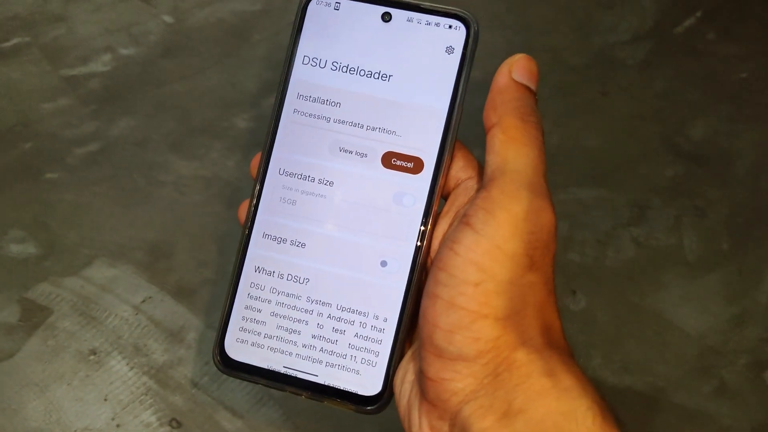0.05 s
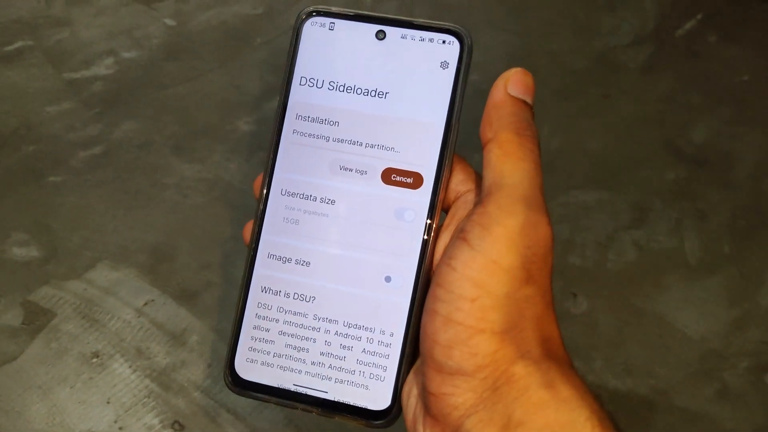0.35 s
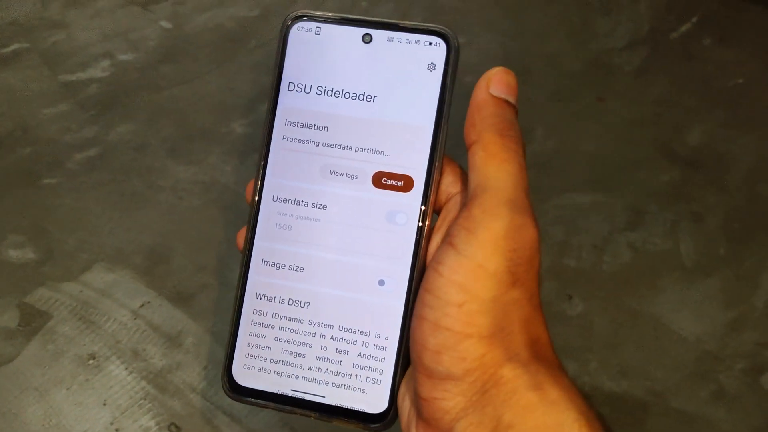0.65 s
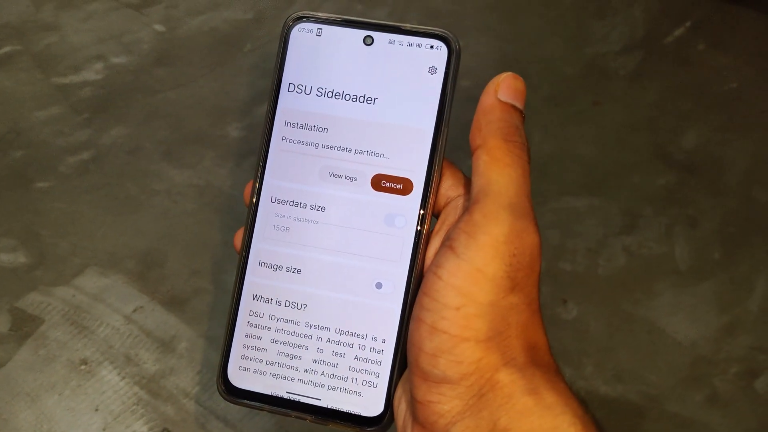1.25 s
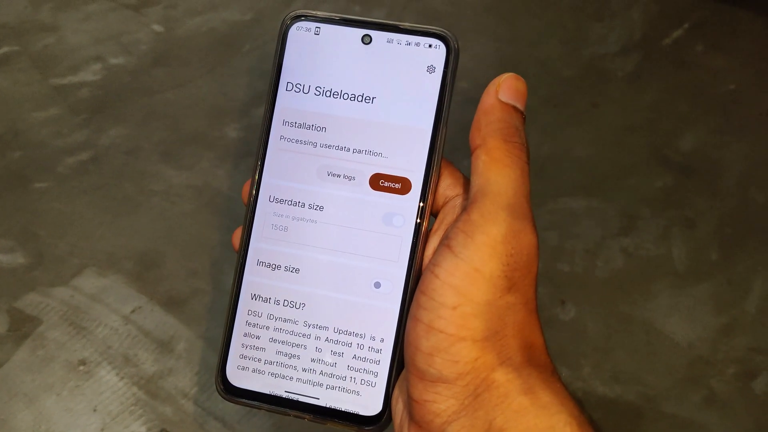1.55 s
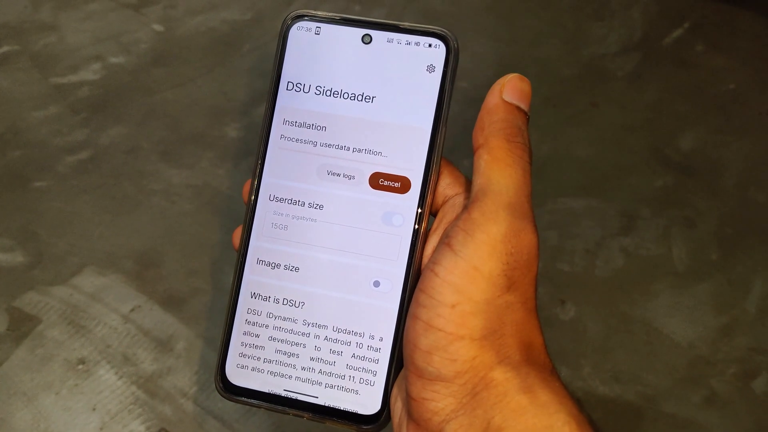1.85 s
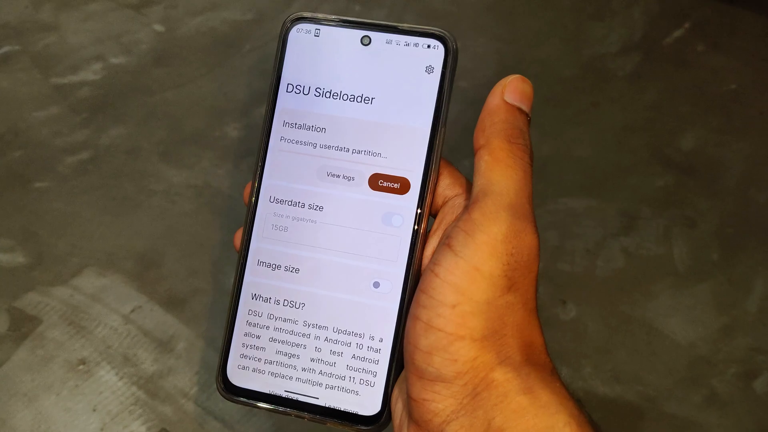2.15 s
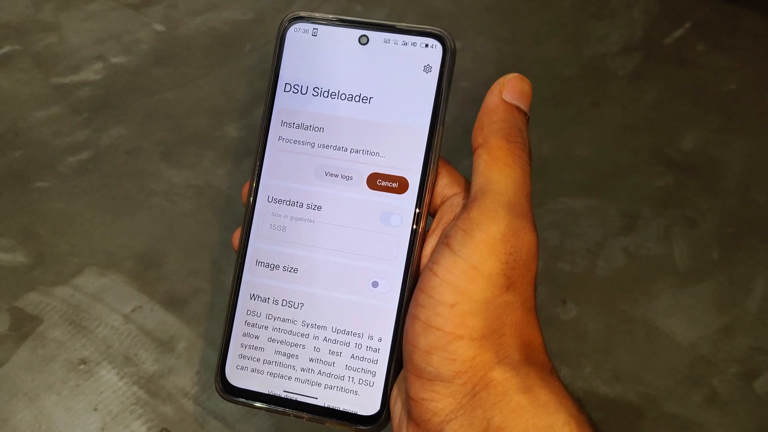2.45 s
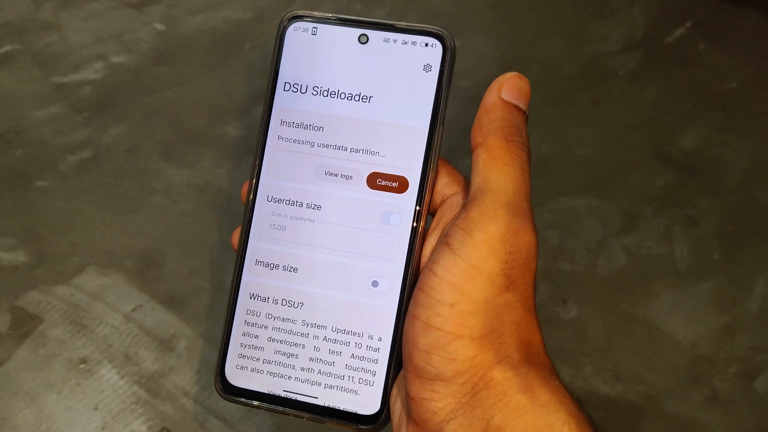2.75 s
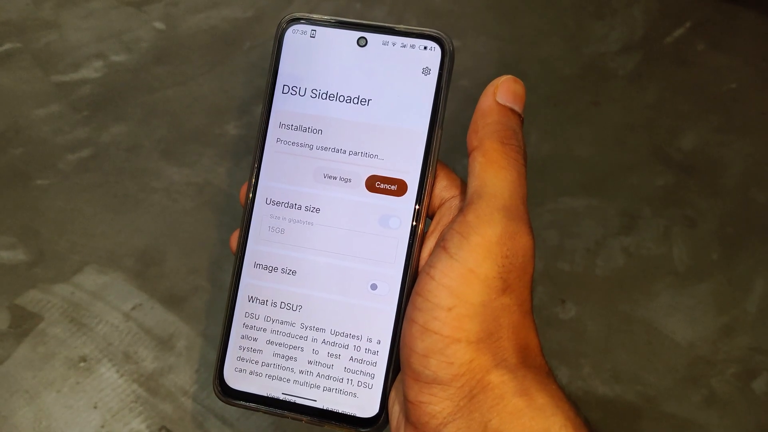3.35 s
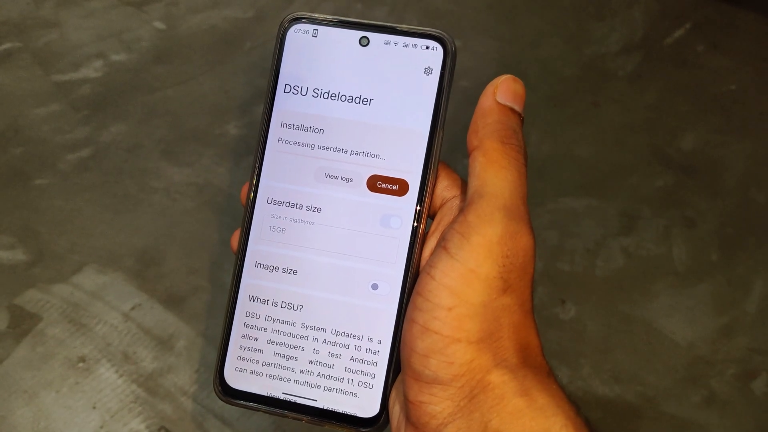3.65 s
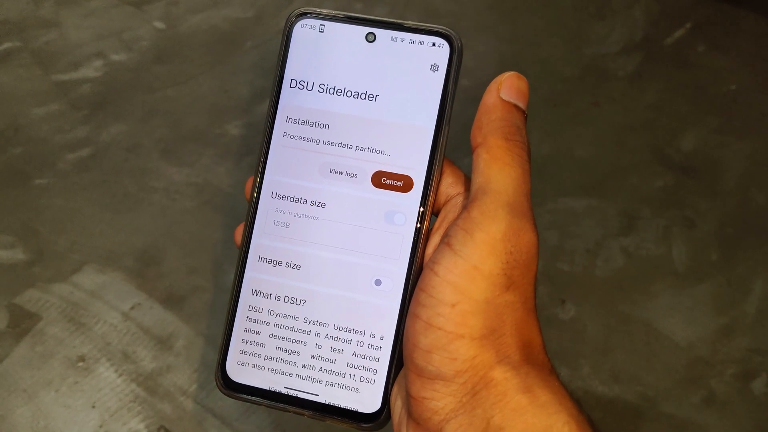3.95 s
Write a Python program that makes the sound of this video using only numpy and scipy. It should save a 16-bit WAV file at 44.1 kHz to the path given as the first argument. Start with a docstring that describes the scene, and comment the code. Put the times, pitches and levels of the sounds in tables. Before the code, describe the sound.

A phone's plastic case clicks and creaks as it is handled up close, with dull bumps on the microphone. Light, hissing skin strokes follow in the second half, over low electrical hum and faint hiss in a quiet room.

```python
"""A low mains hum in a quiet room, over dull air and a thin, steady hiss.
Close by, the grip on a phone shifts: the hand rumbles and bumps softly against the microphone,
and the plastic case ticks and creaks in short clusters. In the second half, skin brushes over
the case in short, hissing strokes."""
import sys
import numpy as np
from scipy import signal
from scipy.fft import rfft, irfft
from scipy.io import wavfile
from scipy.ndimage import uniform_filter1d

SR = 44100
rng = np.random.default_rng(int(sys.argv[2]) if len(sys.argv) > 2 else 0)


def dump(signal):
    """Clip the signal to [-1, 1] and save it as 16-bit WAV at the path in sys.argv[1]."""
    limited = np.clip(np.atleast_2d(signal).T, -1, 1)
    pcm = np.round(limited * 32767).astype(np.int16)
    wavfile.write(sys.argv[1], SR, pcm)


N = 176400
CASE_SIDE_DB = -11  # stereo side re mid, ticks and creaks


def amp(db):
    """Decibels to gain."""
    return 10 ** (np.asarray(db) / 20)


def unit(x):
    """Scale to rms 1."""
    return x / np.sqrt(np.mean(x ** 2) + 1e-20)


def spectrum_db(points, hz):
    """Interpolate (Hz, dB) points on a log-frequency axis."""
    point_hz, db = np.transpose(points)
    return np.interp(np.log(hz + 1), np.log(point_hz + 1), db)


def envelope(points):
    """Gain per sample from (s, dB) points."""
    return amp(np.interp(np.arange(N) / SR, *np.transpose(points)))


def add(mix, start_s, sound):
    """Mix a sound in at start_s."""
    part = mix[..., max(round(start_s * SR), 0):][..., :sound.shape[-1]]
    part += sound[..., :part.shape[-1]]


def noise(gain, size=N):
    """Noise of rms 1, spectrum shaped by gain(Hz)."""
    white = rfft(rng.standard_normal(size))
    return unit(irfft(white * gain(np.fft.rfftfreq(size, 1 / SR)), size))


def band(hz, sigma_hz, size=N):
    """Noise of rms 1 in one Gaussian band."""
    return noise(lambda f: np.exp(-.5 * ((f - hz) / sigma_hz) ** 2) + 1e-9, size)


def stereo(mid, side, balance_db=1.2):
    """Mid and side to left and right, left slightly louder."""
    return np.array([(mid + side) * amp(balance_db / 2), (mid - side) * amp(-balance_db / 2)])


# Each row: frequency in Hz, relative spectral density in dB.
AIR_SPECTRUM = [(20, -5), (45, 3), (75, -2), (130, -3.5), (200, -9.5), (300, -8.5), (470, -7.5), (720, -13),
                (1300, -13.5), (1800, -20.5), (2500, -25.5), (3500, -28), (5000, -33.5), (6500, -38.5),
                (8500, -38.5), (11000, -42.5), (15500, -42)]


def room_air(air_db=-43.5, flicker_db=.92, hiss_hz=7630, hiss_db=-70.5):
    """Dull, faintly flickering air with a narrow band of steady hiss."""
    steady = noise(lambda f: amp(spectrum_db(AIR_SPECTRUM, f)))
    cells = signal.stft(steady, nperseg=1024)[2]
    flicker = uniform_filter1d(rng.standard_normal(cells.shape), size=8, axis=0)
    flicker = unit(uniform_filter1d(flicker, size=8, axis=1))
    air = signal.istft(cells * amp(flicker_db * flicker))[1][:N]
    return amp(air_db) * unit(air) + amp(hiss_db) * band(hiss_hz, sigma_hz=260)


# Each row: time in seconds, level of the hum's octave in dB.
OCTAVE_LEVELS = [(0, -50), (.2, -52), (.35, -41.5), (.53, -44), (.85, -38.5), (1.02, -51.5), (1.4, -40.5),
                 (1.56, -46), (1.78, -41), (1.9, -42), (2.2, -38.5), (2.35, -45), (2.47, -40.5),
                 (2.75, -37.5), (3.15, -58), (3.43, -41), (3.8, -50.5), (4, -33.5)]
# Each row: frequency in Hz, level in dB, noise share of the rms (0-1), noise band sigma in Hz.
HUM_PARTIALS = [(50.3, -29, 0.11, 2.2), (109.5, -57.5, 0.7, 1), (144.6, -52.5, 0.84, 2.9),
                (159.6, -52.5, .75, 5.3), (186.4, -59.5, 0.88, 4), (212.8, -69.5, 1, 2.7),
                (235, -61.5, 0.06, 1.5), (250, -60, .9, 7.8), (303.2, -59, .8, 3.3),
                (344.5, -63, 0.66, 1.5)]


def mains_hum(octave_hz=100.13):
    """A firm mains fundamental, an octave that swells and sinks, and weaker, wavering partials."""
    t = np.arange(N) / SR
    out = envelope(OCTAVE_LEVELS) * unit(np.sin(2 * np.pi * octave_hz * t))
    for hz, db, noise_share, sigma_hz in HUM_PARTIALS:
        tone = np.sqrt(2 * (1 - noise_share ** 2)) * np.sin(2 * np.pi * (hz * t + rng.random()))
        out += amp(db) * unit(tone + noise_share * band(hz, sigma_hz))
    return out


# Each row: time in seconds, rumble level in dB.
RUMBLE_LEVELS = [(0, -49), (.2, -41.5), (1.0, -42), (1.15, -35), (1.35, -41), (1.55, -38), (1.95, -41),
                 (2.25, -43), (2.4, -35.5), (2.65, -35.5), (2.9, -43), (3.2, -33.5), (3.6, -39.5), (4, -46)]
# Each row: peak time in seconds, peak level in dB, pitch in Hz, 1/e half-length in seconds.
HAND_BUMPS = [(1.107, -26, 22, 0.016), (1.593, -23.5, 36.2, 0.0087), (2.743, -20.5, 72, 0.0058)]


def hand(rumble_hz=18.5, rub_hz=236, rub_gain_db=-16):
    """The hand moves against the microphone: deep rumble, dull rubbing and soft bumps."""
    t = np.arange(N) / SR
    rumble = band(rumble_hz, sigma_hz=10.5)
    rub = amp(rub_gain_db) * band(rub_hz, sigma_hz=95)
    out = envelope(RUMBLE_LEVELS) * (rumble + rub)
    for peak_s, db, hz, half_s in HAND_BUMPS:
        pulse = np.exp(-((t - peak_s) / half_s) ** 2)
        out += amp(db) * pulse * np.cos(2 * np.pi * hz * (t - peak_s))
    return out


# Each row: frequency in Hz, relative spectral density of the friction in dB.
SKIN_SPECTRUM = [(800, -2), (3000, -10.5), (5000, -11.5), (5900, -15), (7000, -9), (8400, -4), (9100, -9.5),
                 (10500, -9.5), (11000, -1.5), (11800, -5), (12500, 2), (13500, -5), (14600, 3),
                 (15800, -3.5)]
# Each row: start in seconds, time until the fade in seconds, level in dB.
SKIN_STROKES = [(2.361, 0.015, -46), (2.391, 0.016, -41), (2.541, .045, -46.5), (2.662, .02, -56),
                (2.728, 0.052, -46), (2.845, .02, -56), (2.908, 0.057, -45.5), (3.025, .02, -56),
                (3.083, 0.038, -56.5), (3.123, .022, -52.5), (3.27, .02, -61), (3.302, .022, -49.5),
                (3.454, 0.056, -48.5), (3.582, .02, -53), (3.63, 0.054, -59), (3.848, .012, -59)]


def skin_strokes(attack_s=.013, fall_db_per_s=337, room_gain_db=-11, room_db_per_s=95):
    """Bright friction of skin on the case: each stroke rises, holds and fades into a faint room tail."""
    grain_db, grain_s = 1.5, .01
    t, power = np.arange(N) / SR, np.zeros(N)
    for start_s, hold_s, db in SKIN_STROKES:
        rise = np.clip((t - start_s) / attack_s, 0, 1)
        fading_s = np.maximum(t - start_s - hold_s, 0)
        direct = amp(-fall_db_per_s * fading_s)
        room = amp(room_gain_db - room_db_per_s * fading_s)
        power += (amp(db) * rise) ** 2 * (direct ** 2 + room ** 2)
    grain = unit(amp(grain_db * noise(lambda f: 1 / (1 + f * grain_s))))
    friction = noise(lambda f: amp(spectrum_db(SKIN_SPECTRUM, f)))
    return np.sqrt(power) * grain * friction


# Each row: peak time in seconds, mid level at the peak in dB, centre in Hz, band sigma in Hz,
# 1/e half-length in seconds.
CASE_CREAKS = [(.1823, -44.5, 7300, 700, 0.0015), (0.869, -31.5, 12700, 3530, .0016),
               (2.4726, -34, 14400, 900, .0014), (2.4806, -39.5, 6200, 1020, 0.0039),
               (2.482, -43, 12000, 3000, 0.0034), (2.8225, -39.5, 9700, 600, 0.00098)]


def case_creaks(grain_db=3, grain_hz=1420, size=2048):
    """Stick-slip of the plastic: grainy noise that swells and dies within milliseconds."""
    t = (np.arange(size) - size / 2) / SR
    out = np.zeros((2, N))
    for peak_s, db, hz, sigma_hz, half_s in CASE_CREAKS:
        swell = amp(db) * np.exp(-abs(t) / half_s)
        grain = unit(amp(grain_db * band(0, grain_hz, size)))
        mid = band(hz, sigma_hz, size)
        side = amp(CASE_SIDE_DB) * band(hz, sigma_hz, size)
        add(out, peak_s - size / 2 / SR, swell * grain * stereo(mid, side))
    return out


def case_response(low_db, middle_db, top_db, size, gain_db=26):
    """The case's colour as a minimum-phase response, with a dip between low and middle bands."""
    points = [(1200, low_db - 10.5), (5050, low_db), (6200, middle_db - 7.5),
              (9900, middle_db), (12600, top_db)]
    hz = np.fft.rfftfreq(size, 1 / SR)
    log_gain = np.log(amp(spectrum_db(points, hz) + gain_db))
    mirrored = np.r_[log_gain, log_gain[-2:0:-1]]
    return np.exp(np.conj(signal.hilbert(mirrored)))[:len(hz)]


def burst(decay_s, size):
    """Decaying noise of energy 1."""
    decay = np.exp(-np.arange(size) / SR / decay_s)
    return unit(rng.standard_normal(size) * decay) / np.sqrt(size)


# Each row: start in seconds, relative low, middle and top band levels in dB, rattle decay in seconds,
# ring pitch in Hz, ring level in dB.
CASE_TICKS = [(.1451, -68, -50.5, -54, .0008, 8200, -57), (0.443, -52.5, -59, -65, 0.00088, 3500, -50),
              (0.8711, -39.5, -36, -35, .0012, 3120, -25.5), (0.8717, -40, -51, -46, .0008, 9600, -33),
              (.8794, -61, -53, -45, .0006, 4400, -50), (.884, -60, -55, -48, .0006, 13000, -50),
              (0.885, -62, -47, -44, .0008, 7500, -48), (0.8885, -63, -56, -53, .0006, 7500, -48),
              (.925, -46, -44, -54, 0.0013, 4200, -45), (0.9334, -40, -41, -47, 0.0015, 4500, -35.5),
              (2.44, -65, -57, -51, 0.0012, 4500, -42), (2.4478, -63, -44, -36, .0012, 3900, -37),
              (2.4738, -56, -53, -37, .0012, 5500, -42), (2.4814, -43.5, -34.5, -33, 0.00091, 10900, -33),
              (2.519, -71, -53, -61, .0015, 3230, -35), (3.837, -73, -72, -60, 0.0018, 9500, -48)]


def case_ticks(rattle_gain_db=-4, echo_gain_db=-3, echo_decay_s=.005, ring_decay_s=.0011, size=2048):
    """The plastic snaps: an impulse, rattle and reflections coloured by the case, plus a short ring."""
    t = np.arange(size) / SR
    impulse = t == 0
    out = np.zeros((2, N))
    for start_s, low_db, middle_db, top_db, rattle_s, ring_hz, ring_db in CASE_TICKS:
        rattle = amp(rattle_gain_db) * burst(rattle_s, size)
        echoes = amp(echo_gain_db) * burst(echo_decay_s, size)
        side = amp(CASE_SIDE_DB) * burst(rattle_s, size)
        drive = stereo(impulse + rattle + echoes, side)
        snap = irfft(rfft(drive) * case_response(low_db, middle_db, top_db, size), size)
        ring = amp(ring_db) * np.exp(-t / ring_decay_s) * np.sin(2 * np.pi * ring_hz * t)
        add(out, start_s, snap + ring)
    return out


def scene():
    """The humming room and the handling close by."""
    return room_air() + mains_hum() + hand() + case_ticks() + case_creaks() + skin_strokes()


def record(dry):
    """Steep low-pass on both channels."""
    cutoff_hz = 15850
    lowpass = signal.firwin(401, cutoff_hz, window=("kaiser", 8), fs=SR)
    return signal.oaconvolve(dry, lowpass[None], "same")


dry = scene()
out = record(dry)
dump(out)
```